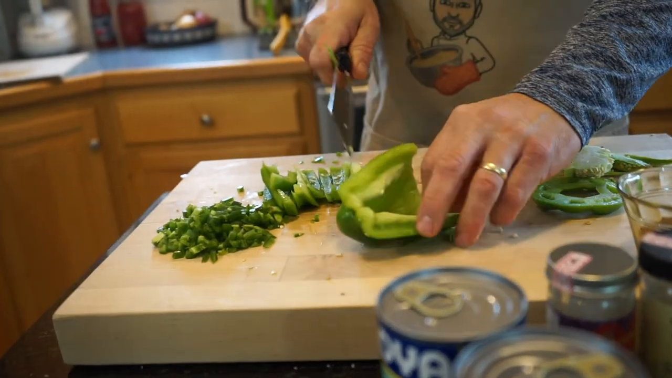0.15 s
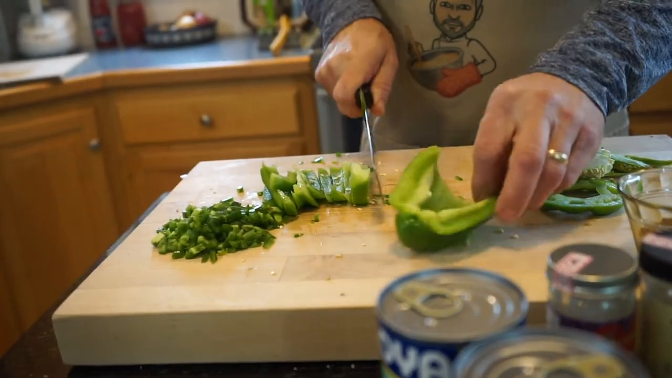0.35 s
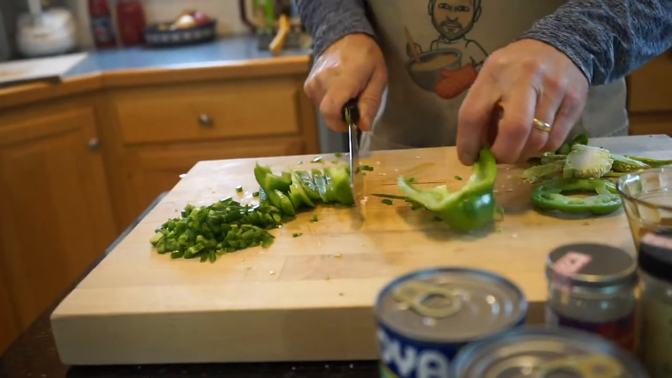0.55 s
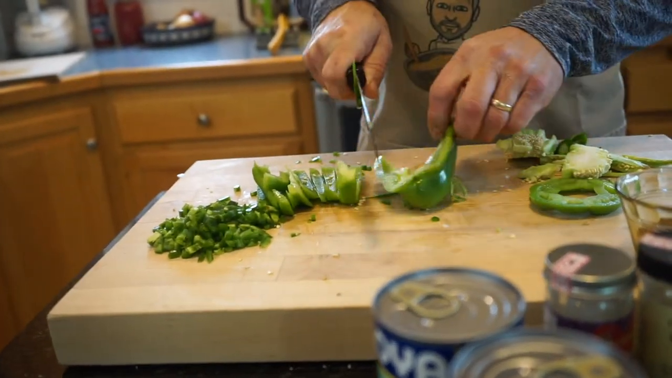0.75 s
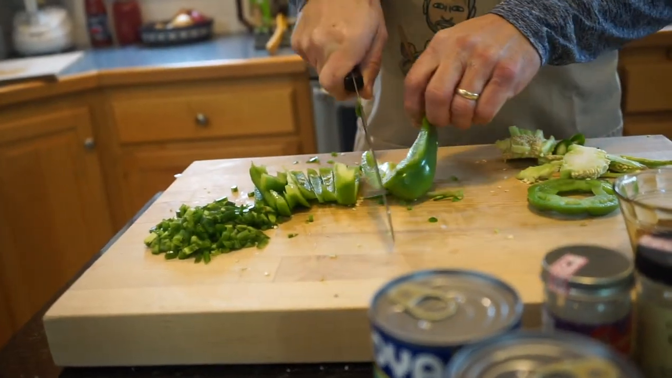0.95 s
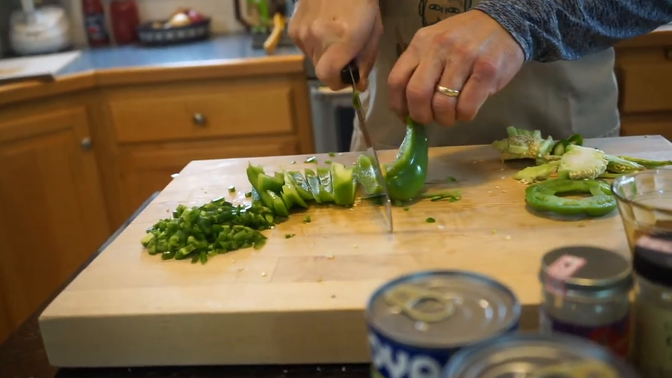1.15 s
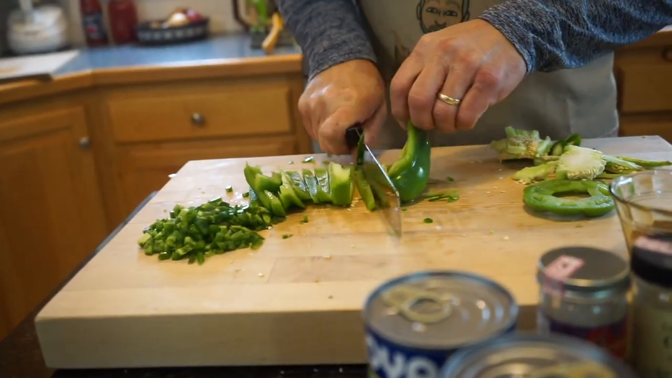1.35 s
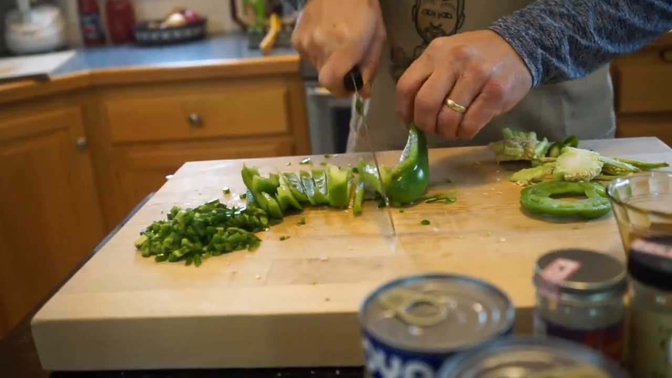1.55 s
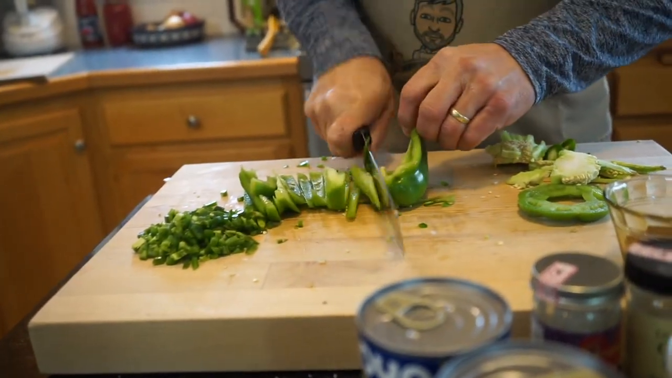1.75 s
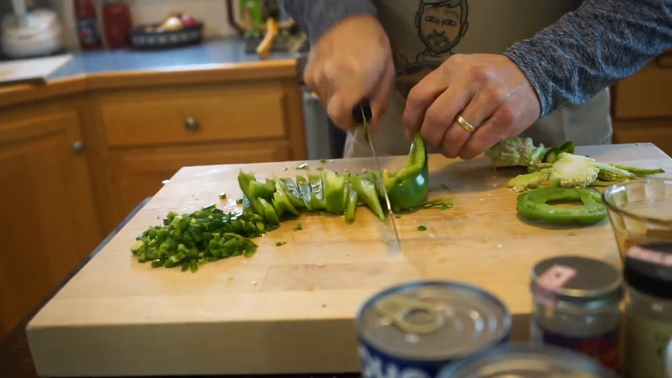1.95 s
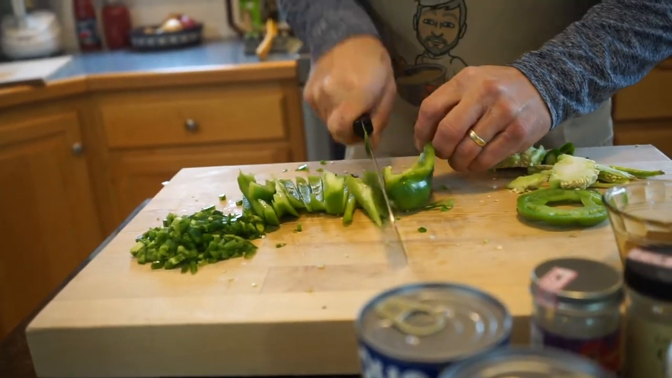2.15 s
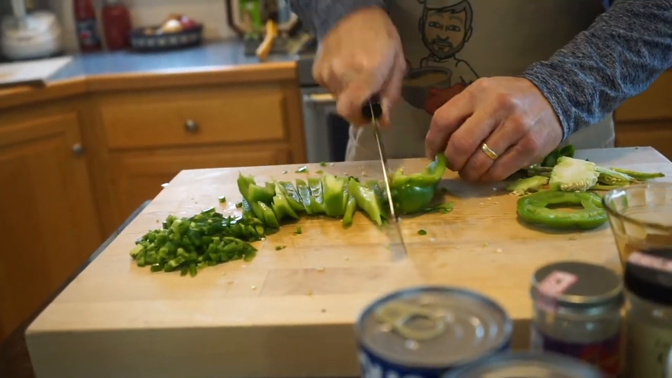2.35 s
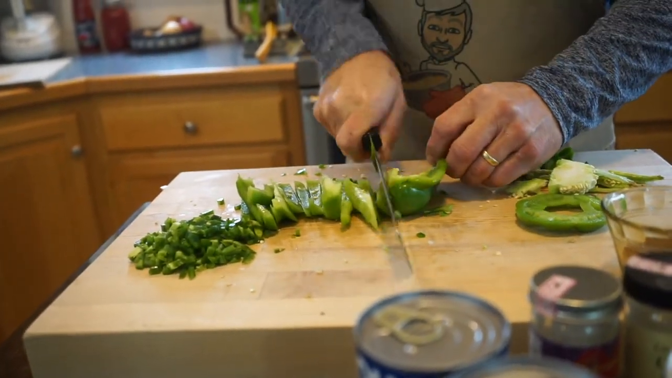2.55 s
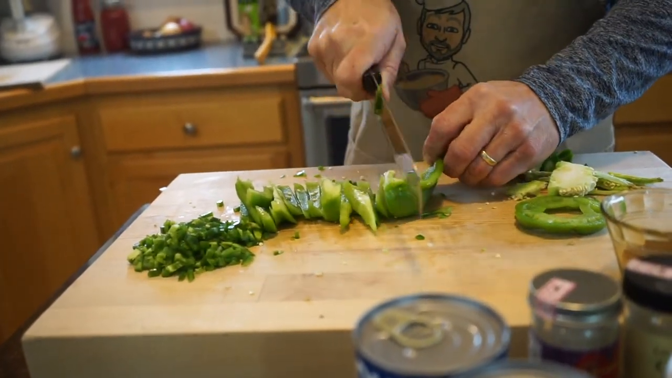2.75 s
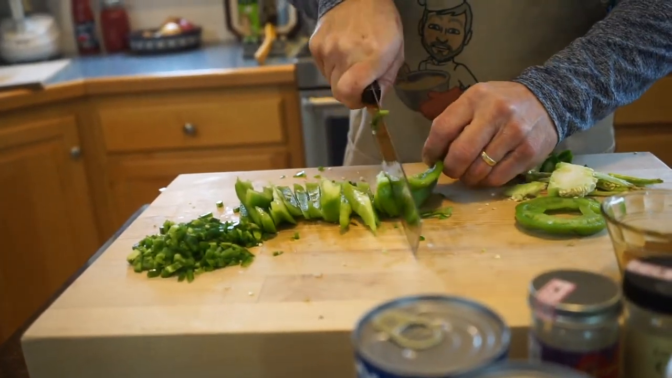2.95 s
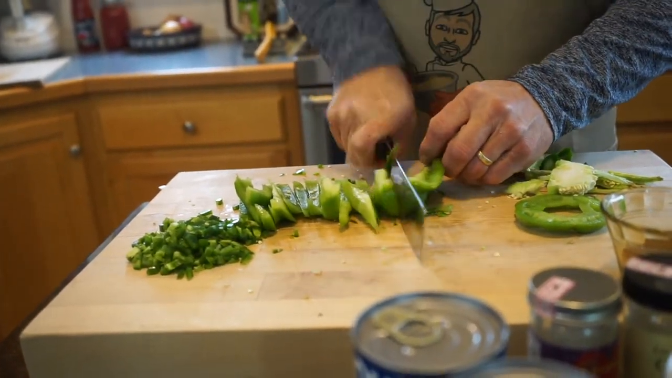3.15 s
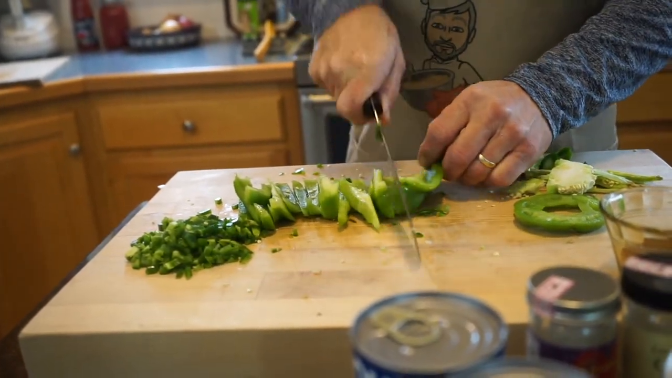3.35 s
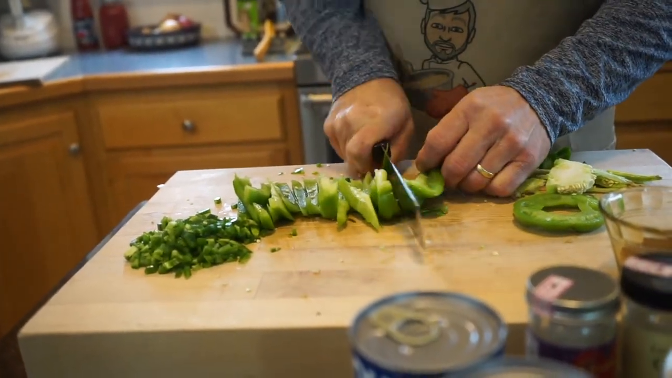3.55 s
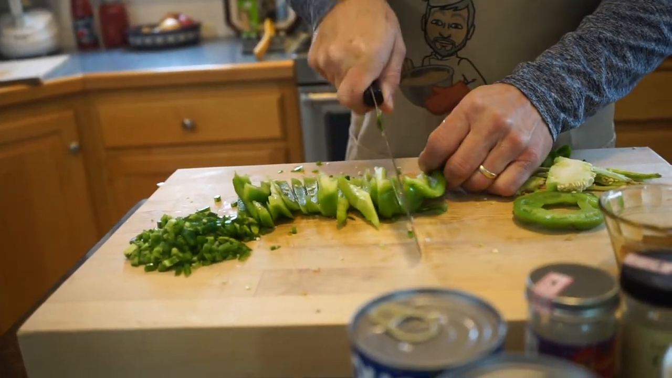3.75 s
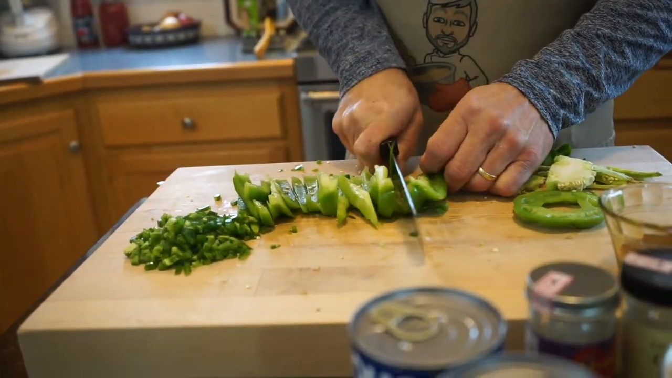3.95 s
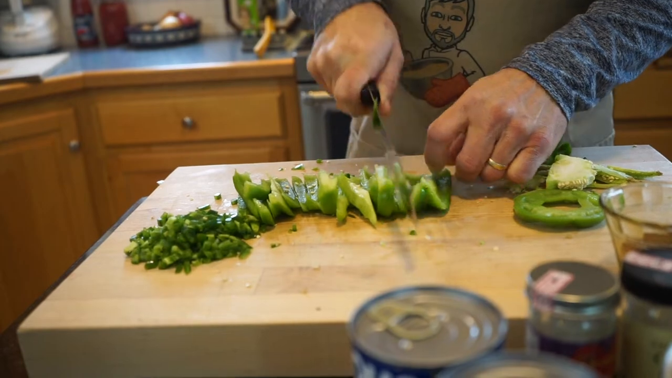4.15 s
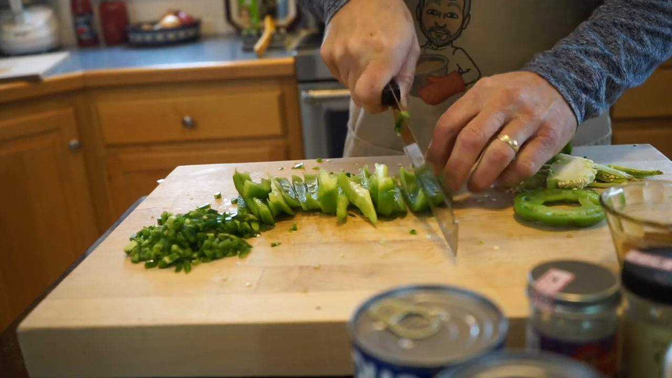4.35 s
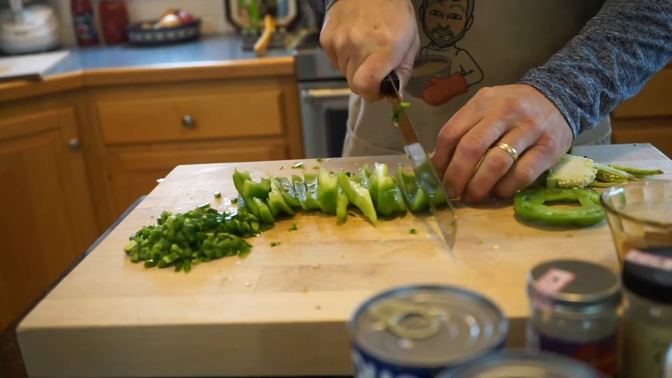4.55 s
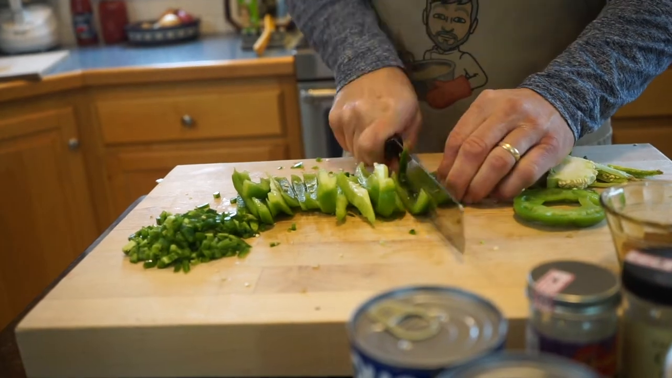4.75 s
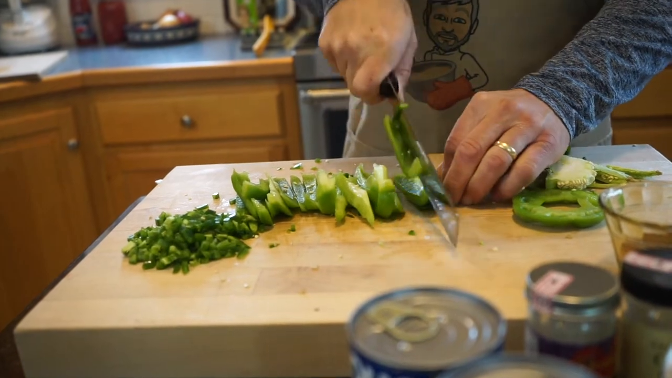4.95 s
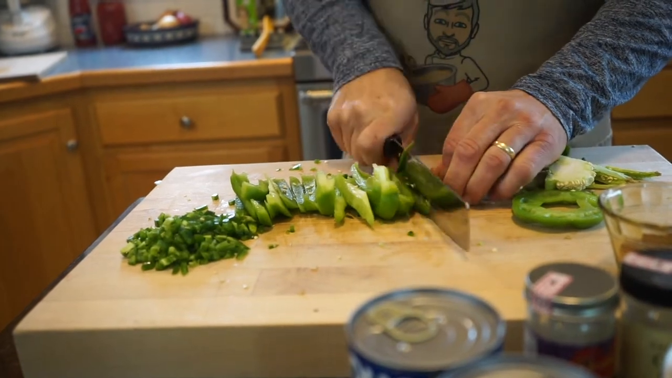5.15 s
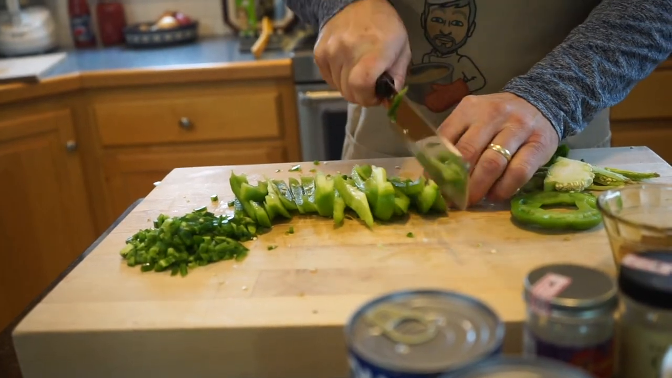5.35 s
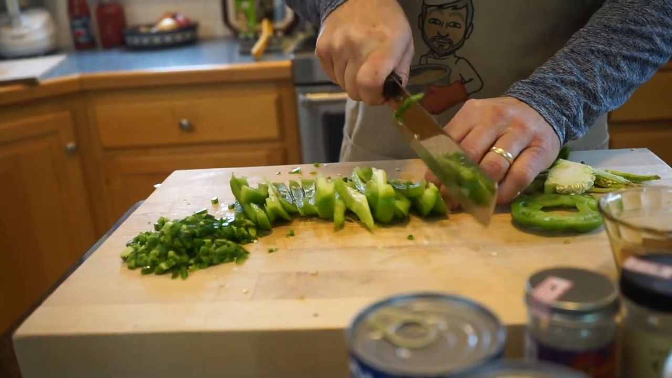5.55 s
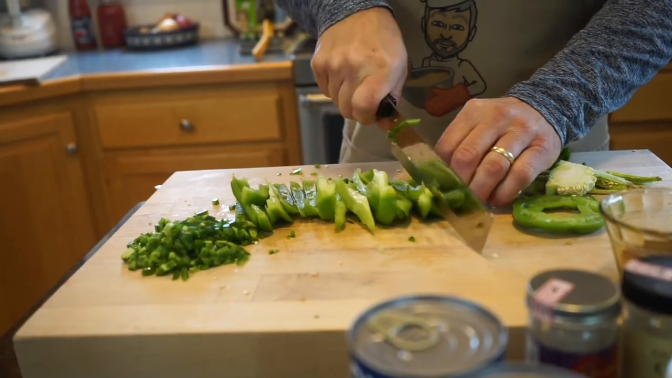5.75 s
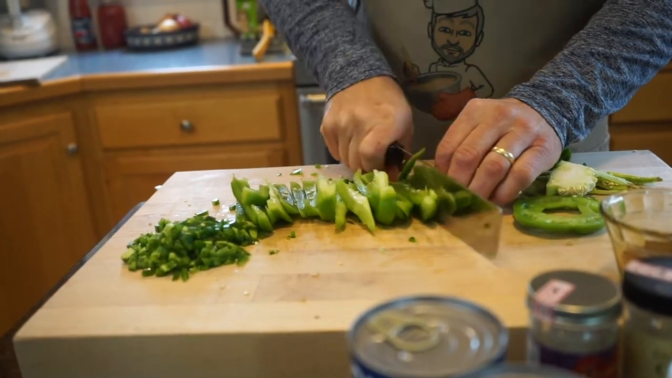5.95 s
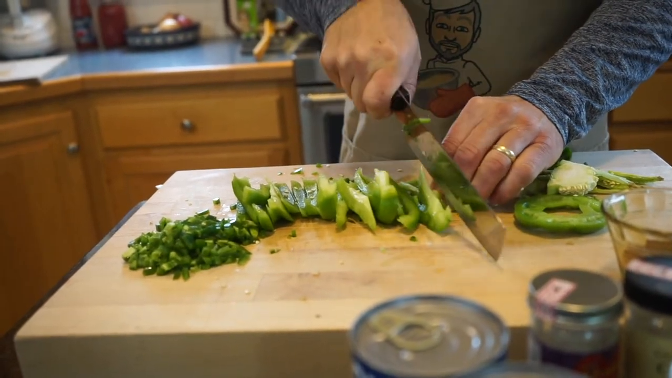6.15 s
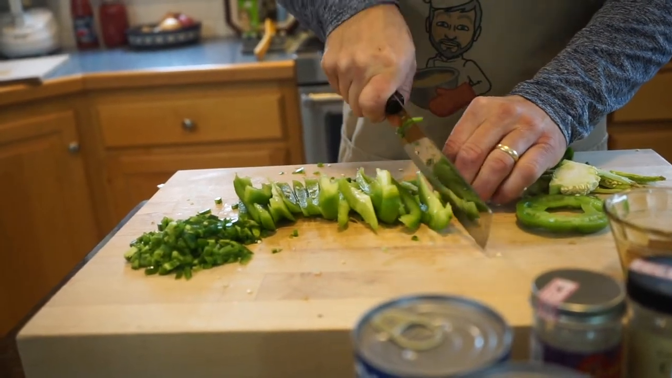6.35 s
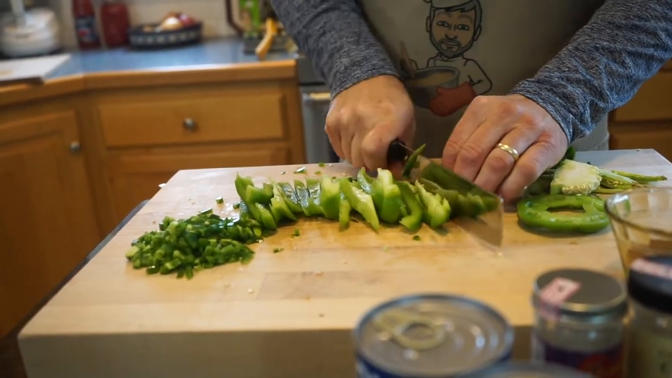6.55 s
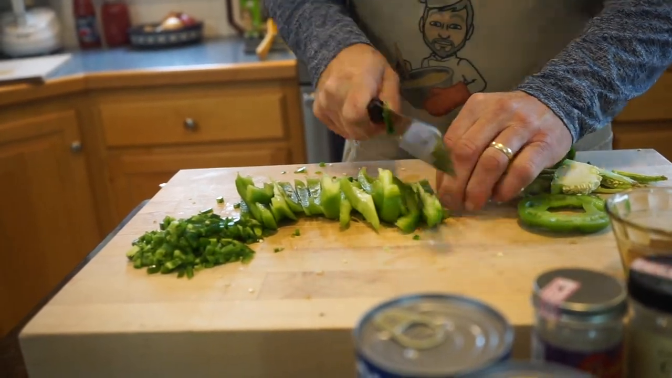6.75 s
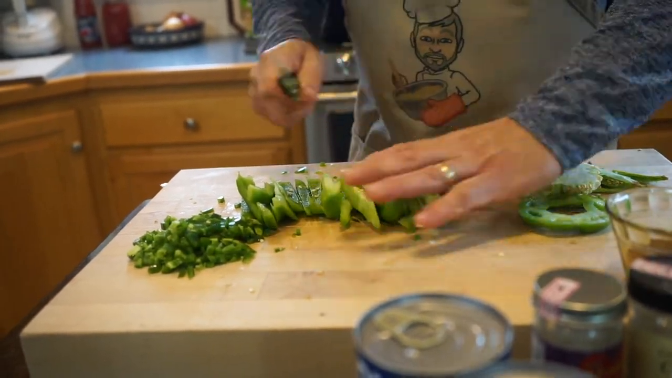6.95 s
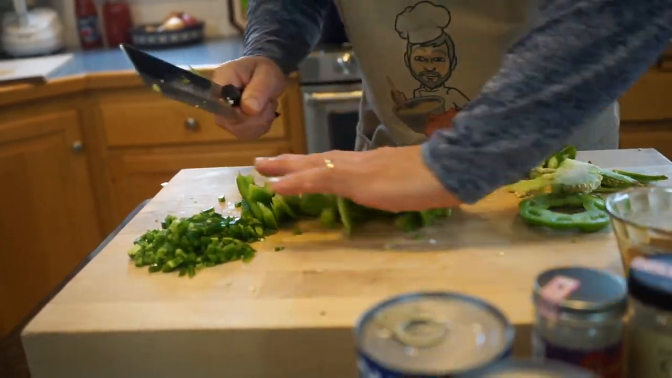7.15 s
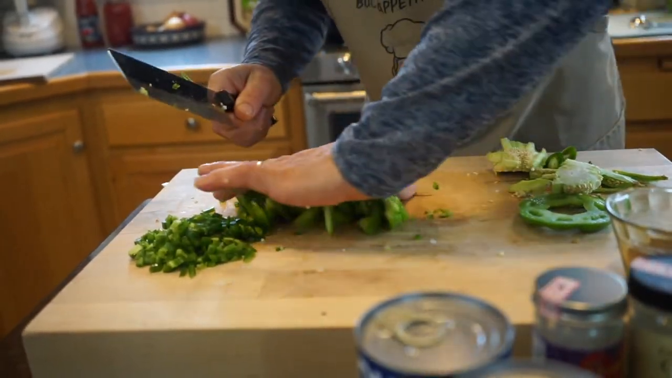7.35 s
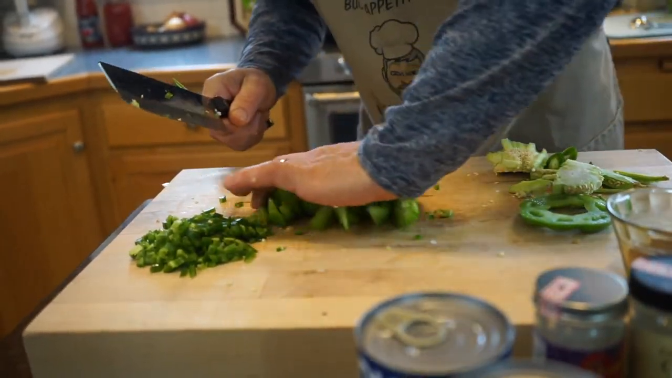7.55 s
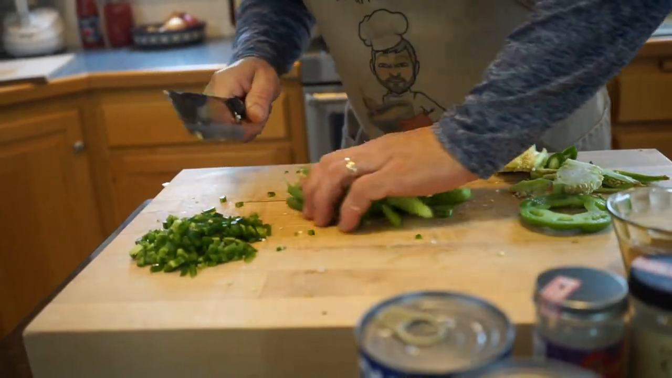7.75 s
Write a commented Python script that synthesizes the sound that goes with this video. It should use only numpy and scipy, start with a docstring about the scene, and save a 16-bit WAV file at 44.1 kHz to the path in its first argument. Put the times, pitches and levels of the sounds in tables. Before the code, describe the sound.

Close stereo sound of pepper slicing in a home kitchen. Two hard, hollow chops ring the board, followed by slower strokes in which crisp flesh crunches, skin ticks and tears, and the blade knocks wood. One brighter cracking chop falls midway. Strokes stop before the end, leaving low arm rumble, tiny snaps and brushing over quiet hiss. Short room reflections; the right side is clearer, the left duller.

```python
"""A chef's knife slices a bell pepper on a thick wooden board in a small kitchen, with a few bare chops.
Slices: bursting cells crunch, the skin clicks and tears, damped board modes knock, tiny slips scratch the wood.
Around them: faint handling, dull low bumps, arm rumble, hiss and a faint whirr, all from shaped noise or sines.
Two spaced microphones: the right hears the board best, the left picks up dull bumps and rumble."""
import sys
import numpy as np
from scipy import signal
from scipy.fft import rfft, irfft
from scipy.io import wavfile

SR = 44100
rng = np.random.default_rng(int(sys.argv[2]) if len(sys.argv) > 2 else 0)


def file_out(sig):
    """Save sig as 16-bit WAV at sys.argv[1]."""
    # one column per channel
    cols = np.atleast_2d(sig).T
    # limit, then scale
    lim = np.clip(cols, -1, 1)
    pcm = np.round(lim * 32767).astype(np.int16)
    wavfile.write(sys.argv[1], SR, pcm)


N = 343759
T = np.arange(N) / SR
CUTOFF_HZ = 11120


def amp(db):
    """Decibels to gain."""
    return 10 ** (np.asarray(db) / 20)


def unit(x):
    """Scale to rms 1."""
    return x / np.sqrt(np.mean(x ** 2) + 1e-20)


def add(track, s, sound):
    """Mix a sound in at time s."""
    start = int(s * SR)
    track[start:start + len(sound)] += sound[:N - start]


def band(x, low_hz, high_hz):
    """Gentle band-pass."""
    return signal.sosfilt(signal.butter(2, [low_hz, high_hz], "band", fs=SR, output="sos"), x)


def high_pass(x, low_hz):
    """Gentle high-pass."""
    return signal.sosfilt(signal.butter(2, low_hz, "high", fs=SR, output="sos"), x)


def decay(t, t60_s):
    """Exponential decay, 60 dB in t60_s."""
    return amp(-60 * t / t60_s)


def at_hz(points, hz):
    """Read a table on a log-frequency axis."""
    known, values = np.transpose(points)
    return np.interp(np.log(np.maximum(hz, 1)), np.log(known), values)


def colour(x, spectrum, size=4096):
    """Causal (minimum-phase) filter with the given spectrum and unit energy."""
    hz = np.arange(size // 2 + 1) * SR / size
    cepstrum = irfft(np.log(amp(at_hz(spectrum, hz))))
    pulse = irfft(np.exp(rfft(2 * cepstrum[:size // 2], size)))
    return signal.fftconvolve(x, pulse / np.linalg.norm(pulse))[:len(x)]


def drift(per_s):
    """Slow random wander, spread 1."""
    knots = rng.standard_normal(4096)
    return unit(np.interp(T * per_s, np.arange(len(knots)), knots))


def swell(s, db, rise_db_per_s, fall_db_per_s, hold_s=0):
    """Gain over time that rises to a level, holds it until time s and dies away."""
    before = rise_db_per_s * np.maximum(s - hold_s - T, 0)
    after = fall_db_per_s * np.maximum(T - s, 0)
    return amp(db - np.minimum(before + after, 200))


# slicing strokes: (blade lands [s], knock [dB], crunch [dB], crunch length [s], first bite [dB],
# slide [dB], arm rumble [dB])
SLICES = [(1.339, -35, -36, 0.018, -45.5, -62, -40.5), (1.725, -41.5, -41, 0.019, -43, -46, -40.5),
          (2.077, -35, -39, 0.011, -41.5, -47.5, -39), (2.491, -43.5, -40.5, .006, -43, -40.5, -41),
          (3.233, -44.5, -40.5, 0.014, -49, -45, -42), (3.61, -37, -40.5, 0.0063, -45, -48, -40),
          (3.975, -40, -42.5, 0.0099, -45, -52.5, -38.5), (4.775, -41, -42, 0.014, -46, -50.5, -40.5),
          (5.161, -47.5, -42, 0.037, -45.5, -51, -42.5), (5.959, -40.5, -39, 0.012, -42, -78, -39.5),
          (6.491, -46.5, -42.5, 0.039, -67, -75, -40.5)]
# chops on the almost bare board: (time [s], level [dB], brightness [dB/octave], struck-spot centre [Hz],
# struck-spot boost [dB], share of ring time left [1], blade crack [dB])
CHOPS = [(0.456, -28, 1.5, 1440, 1.5, 0.74, -24), (0.926, -28.5, 4.5, 896, 13.5, 1.0, -24),
         (2.899, -39, -0.5, 896, 11.5, 0.45, -37), (4.4228, -34, 1.8, 750, 12, 0.58, -23),
         (5.687, -42, 0, 780, 9, 0.47, -42)]
# spectrum common to all blows: (frequency [Hz], level [dB per band])
LANDING = [(430, 2), (635, 1.5), (900, -4), (1400, 2.5), (2440, -6)]
# edges of the knock bands: [Hz]
BOARD_BANDS_HZ = [330, 560, 720, 1120, 1750, 3400]
BODY_OCTAVES = 0.54   # width of the range that a chop brings out
SLICE_RING_SHARE = 0.57   # ring time left under the pressing blade


def blows():
    """Every meeting of blade and board as (s, dB per band, ring share); chops stress the struck spot's range."""
    hz = np.sqrt(np.multiply(BOARD_BANDS_HZ[:-1], BOARD_BANDS_HZ[1:]))
    plain = at_hz(LANDING, hz)
    octaves = np.log2(hz / np.median(hz))
    out = []
    for s, db, tilt, body_hz, body_db, ring_share, _ in CHOPS:
        body = body_db * np.exp(-(np.log2(hz / body_hz) / BODY_OCTAVES) ** 2)
        out.append((s, db + plain + tilt * octaves + body, ring_share))
    return out + [(s, db + plain, SLICE_RING_SHARE) for s, db, *_ in SLICES]


# modes of the board with the blade on it: (frequency [Hz], level [dB], t60 at full ring [s])
BOARD_MODES = [(368.2, -6.5, 0.25), (474.2, 9, 0.18), (504.5, 5, 0.11), (651.4, 14, 0.27), (686.4, 4, 0.23),
               (769.3, 14, 0.15), (841, 12, 0.22), (1005, -10, 0.13), (1075, -4.5, 0.21), (1220, 3, 0.045),
               (1271.4, 1, 0.11), (1352, -9, 0.25), (1442, -7.5, 0.11), (1560, -43, 0.56),
               (1890, -4.5, 0.042), (1972, 1, 0.096), (2114, -3.5, 0.062), (2258, 0, 0.034),
               (2912, -17, 0.24), (3130, -14, 0.16), (3180, -10, 0.21), (3250, -20, 0.7),
               (3290, -18.5, 0.22)]


def board_ring(low_hz, high_hz, t, ring_share, vary_db, rise_cycles):
    """Board modes in one band: low ones swell more slowly, strengths vary with the spot that is hit."""
    hz, db, t60 = np.transpose(BOARD_MODES)[:, :, None]
    in_band = (hz >= low_hz) * (hz < high_hz)
    strength = amp(db + vary_db * rng.standard_normal(hz.shape)) * in_band
    sign = (-1) ** np.arange(len(hz))[:, None]
    envelope = decay(t, t60 * ring_share) * (1 - np.exp(-t * hz / rise_cycles))
    return np.sum(sign * strength * envelope * np.sin(2 * np.pi * hz * t), axis=0)


def knocks(trim_db=1.0, thud_db=-4.0, thud_t60_s=0.1, vary_db=3.5, rise_cycles=0.33,
           tick_db=-4, tick_t60_s=0.013):
    """Each blow gives a tick of the edge, a short thud of decaying noise, then the board's lasting ring."""
    out, t, early = np.zeros(N), T[:SR // 2], SR // 30
    for s, levels, ring_share in blows():
        for low, high, db in zip(BOARD_BANDS_HZ, BOARD_BANDS_HZ[1:], levels):
            ring = unit(board_ring(low, high, t, ring_share, vary_db, rise_cycles))
            thud = band(rng.standard_normal(len(t)) * decay(t, thud_t60_s), low, high)
            thud = band(band(thud, 495, 2400), 474, 4600)
            blow = ring + amp(thud_db) * unit(thud)
            # level set over the first 1/30 s
            add(out, s, amp(db + trim_db) * blow / np.std(blow[:early]))
        # tick follows the top band
        tick = unit(band(rng.standard_normal(len(t)), 1700, 9800)) * decay(t, tick_t60_s)
        add(out, s, amp(levels[-1] + tick_db) * tick)
    return out


def chop_attack(crack_t60_s=.055, crack_low_hz=2000, crack_high_hz=2900, push_db=-11, push_t60_s=0.14):
    """A bare chop cracks in the steel blade and gives the whole board a short low shove."""
    out, t = np.zeros(N), T[:SR // 4]
    for s, db, _, _, body_db, _, steel_db in CHOPS:
        steel, wood = rng.standard_normal((2, len(t)))
        crack = unit(band(steel, crack_low_hz, crack_high_hz)) * decay(t, crack_t60_s)
        shove = unit(band(wood, 50, 340)) * decay(t, push_t60_s)
        add(out, s, amp(steel_db) * crack + amp(db + body_db / 2 + push_db) * shove)
    return out


def counter(level_db=-29, t60_s=0.5):
    """Blows shake the counter under the board: a faint low thump set by each blow's loudest band."""
    out, t = np.zeros(N), T[:SR // 2]
    for s, levels, _ in blows():
        thump = unit(band(rng.standard_normal(len(t)), 76, 235)) * decay(t, t60_s)
        add(out, s, amp(max(levels) + level_db) * thump)
    return out


# thin scraps crushed just ahead of a chop: (blade through [s], crunch [dB], length [s])
SCRAPS = [(2.894, -50.5, .014), (5.686, -54.5, 0.02)]
THROUGH_S = 0.0044   # the flesh parts this long before the blade lands
CRUNCH_RISE_DB_PER_S, CRUNCH_FALL_DB_PER_S, BITE_RISE_DB_PER_S = 800, 463, 167.5


def cutting():
    """Force in the flesh: the edge bites in slowly, then the wall gives way at once; scraps need no bite."""
    force = np.zeros(N)
    for s, _, db, length_s, bite_db, *_ in SLICES:
        through_s = s - THROUGH_S
        wall = swell(through_s, db, CRUNCH_RISE_DB_PER_S, CRUNCH_FALL_DB_PER_S, length_s)
        bite = swell(through_s, bite_db, BITE_RISE_DB_PER_S, CRUNCH_FALL_DB_PER_S)
        force += np.maximum(wall, bite)
    for s, db, length_s in SCRAPS:
        force += swell(s, db, CRUNCH_RISE_DB_PER_S, CRUNCH_FALL_DB_PER_S, length_s)
    return force


# crunch spectrum: (frequency [Hz], level [dB per Hz])
CRUNCH_SPECTRUM = [(210, -52.5), (350, -24), (481, 1.5), (572, -21), (763, 0.5), (907, -12), (1130, -12),
                   (1250, -1), (1590, -13), (3000, -2.5), (3890, -9.5), (7340, -12), (11000, -14.5),
                   (14300, -124), (22000, -120)]


def crunch(trim_db=6.0, size_db=1.0, clumps_per_s=240, cells_per_s=4000, clump_db=3.2):
    """Cells burst in clumps under the edge, thousands a second, until the blade is through."""
    sizes = amp(size_db * np.minimum(rng.exponential(1, N), 4)) * rng.choice([-1, 1], N)
    hits = rng.random(N) < cells_per_s / SR
    bursts = sizes * hits * amp(clump_db * drift(clumps_per_s))
    return amp(trim_db) * colour(unit(bursts) * cutting(), CRUNCH_SPECTRUM)


# skin giving way: (time [s], click peak [dB], rasping tear [dB])
SNAPS = [(1.272, -19.5, -38), (1.3085, -15.5, -24), (1.3223, -16, -23), (1.6422, -26.5, -37),
         (1.712, -35, -39), (2.0729, -8.5, -42), (2.879, -43, -37), (2.9639, -20.5, -50), (3.213, -32, -28),
         (3.597, -24, -32), (3.959, -22, -28), (4.744, -26, -22), (5.102, -33, -30), (5.892, -24, -30.5),
         (6.4504, -12, -32.5), (6.4617, -19, -55), (6.9583, -18.5, -50), (7.452, -26, -46)]
# click spectrum: (frequency [Hz], level [dB per Hz])
SNAP_SPECTRUM = [(300, -14), (900, 2.5), (2200, 3), (3200, 7.5), (4200, 1), (8000, 1.5), (11000, -4)]


def snaps(click_t60_s=0.022, tear_trim_db=-1, tear_t60_s=0.084, tear_rise_s=0.0045, fibres_per_s=1000):
    """The taut skin gives way with a click; fibres then tear in a short mid-pitched rasp."""
    out, t = np.zeros(N), T[:SR // 10]
    for s, peak_db, rasp_db in SNAPS:
        burst = amp(-13.5) * decay(t, click_t60_s) * rng.laplace(0, .5, len(t))
        burst[0] = 1
        click = colour(burst, SNAP_SPECTRUM)
        fibres = rng.standard_normal(len(t)) * (rng.random(len(t)) < fibres_per_s / SR)
        tear = unit(band(fibres, 2000, 3070)) * decay(t, tear_t60_s) * (1 - np.exp(-t / tear_rise_s))
        add(out, s, amp(peak_db) * click / np.abs(click).max() + amp(rasp_db + tear_trim_db) * tear)
    return out


DRAW_LEAD_S, DRAW_DB, DRAW_SLOPE_DB_PER_S = 0.19, -59.5, 88
PUSH_LEAD_S, PUSH_RISE_DB_PER_S, PUSH_FALL_DB_PER_S = 0.056, 189, 260


def sliding():
    """Friction on the wood: before each slice lands the tip is drawn back lightly, then pushed forward."""
    friction = np.zeros(N)
    for s, *_, slide_db, _ in SLICES:
        friction += swell(s - DRAW_LEAD_S, DRAW_DB, DRAW_SLOPE_DB_PER_S, DRAW_SLOPE_DB_PER_S)
        friction += swell(s - PUSH_LEAD_S, slide_db, PUSH_RISE_DB_PER_S, PUSH_FALL_DB_PER_S)
    return friction


def drag(uneven_db=2.0, slips_per_s=2200, scratch_db=1):
    """The edge slides on the wood: tiny slips scratch and keep the board murmuring."""
    slips = rng.standard_normal(N) * (rng.random(N) < slips_per_s / SR) * amp(uneven_db * drift(40))
    murmur = np.zeros(N)
    for hz, width_hz, db in [(672, 99, -0.5), (1284, 51, 0.0), (1950, 230, -6.5)]:
        murmur += amp(db) * unit(band(slips, hz - width_hz / 2, hz + width_hz / 2))
    scratch = unit(band(slips, 1010, 2560))
    return unit(murmur + amp(scratch_db) * scratch) * sliding()


# faint handling sounds: hands and loose pieces brushing the board, one faint blade ting:
# (middle [s], half length [s], level [dB], centre [Hz])
HANDLING_SOUNDS = [(0.34, 0.042, -64.5, 8900), (0.522, 0.053, -58, 8000), (1.498, 0.013, -51.5, 5600),
                   (1.588, 0.017, -65, 1970), (4.086, 0.012, -47, 500), (6.065, 0.035, -50, 1140),
                   (6.204, 0.042, -54, 1480), (6.644, 0.035, -56.5, 2200), (7.032, 0.012, -48.5, 1200),
                   (7.696, 0.079, -58, 3000)]


def handling(grain_db=3):
    """Hands and loose pieces brushing the board, one faint blade ting: grainy noise in two-octave bands."""
    out = np.zeros(N)
    for s, half_s, db, hz in HANDLING_SOUNDS:
        noise = unit(band(rng.standard_normal(N), hz / 2, min(hz * 2, CUTOFF_HZ)))
        grains = noise * amp(grain_db * drift(200))
        out += amp(db) * grains * np.exp(-((T - s) / half_s) ** 2)
    return out


# dull bumps at the left microphone: (time [s], peak before trim [dB])
BUMPS = [(1.415, -35), (2.16, -38.5), (2.573, -38.5), (3.307, -36.5), (3.685, -37.5), (4.053, -36),
         (5.24, -35), (6.065, -32.5), (6.583, -36)]


def bumps(trim_db=7, bump_hz=215, bump_t60_s=0.017, rise_s=0.0093):
    """Something soft rocks just after most slices: a few low cycles, 22 dB weaker at the right."""
    out, t = np.zeros(N), T[:SR // 10]
    bump = np.sin(2 * np.pi * bump_hz * t) * decay(t, bump_t60_s) * (1 - np.exp(-(t / rise_s) ** 2))
    for s, db in BUMPS:
        add(out, s, amp(db + trim_db) * bump / np.abs(bump).max())
    return out * amp([[0], [-22]])


# the free arm sweeps the slices together: (time [s], rumble [dB])
REACHES = [(6.98, -41), (7.349, -44)]
SWAY_LAG_S, SWAY_RISE_DB_PER_S, SWAY_FALL_DB_PER_S = 0.063, 59, 40   # peaks after each landing
STILL_DB, CHOP_SWAY_DB = -51.5, -49   # resting arms, and after a chop


def arm_motion(reach_slope_db_per_s=35):
    """The arms sway after every stroke and move more slowly when gathering the slices."""
    landings = [(s, db) for s, *_, db in SLICES] + [(s, CHOP_SWAY_DB) for s, *_ in CHOPS]
    sways = [swell(s + SWAY_LAG_S, db, SWAY_RISE_DB_PER_S, SWAY_FALL_DB_PER_S) for s, db in landings]
    reaches = [swell(s, db, reach_slope_db_per_s, reach_slope_db_per_s) for s, db in REACHES]
    return np.maximum(amp(STILL_DB), np.max(sways + reaches, axis=0))


# rumble spectrum: (frequency [Hz], level [dB per Hz])
RUMBLE_SPECTRUM = [(15, 5.5), (30, -1.5), (60, -5.5), (100, -13.5), (200, -20.5), (300, -25), (600, -43.5),
                   (2000, -49)]


def rumble(left_db=5, right_db=-3, right_cut_hz=45):
    """Low handling rumble that follows the arms, from unrelated noise in the two microphones."""
    left, right = (unit(colour(noise, RUMBLE_SPECTRUM)) for noise in rng.standard_normal((2, N)))
    right = unit(high_pass(right, right_cut_hz))
    return np.array([amp(left_db) * left, amp(right_db) * right]) * arm_motion()


# hiss spectrum: (frequency [Hz], level [dB per Hz])
AIR_SPECTRUM = [(59, -39), (100, -1), (167, -12.5), (307, 2), (412, -9.5), (587, -7.5), (853, -12),
                (1040, -12), (1170, -12.5), (1600, -9), (2520, -13.5), (3190, -9.5), (4110, -19),
                (5310, -15.5), (11000, -27.5), (14300, -75), (22000, -120)]


def background(left_db=-61.5, right_db=-54.5, whirr_hz=1045, whirr_width_hz=70,
               whirr_left_db=-74, whirr_right_db=-62):
    """Steady hiss with the faint narrow whirr of an appliance."""
    hiss = np.array([unit(colour(noise, AIR_SPECTRUM)) for noise in rng.standard_normal((2, N))])
    low_hz, high_hz = whirr_hz - whirr_width_hz / 2, whirr_hz + whirr_width_hz / 2
    whirr = unit(band(rng.standard_normal((2, N)), low_hz, high_hz))
    return hiss * amp([[left_db], [right_db]]) + whirr * amp([[whirr_left_db], [whirr_right_db]])


def scattered(x, t60_s=0.1):
    """A dense cluster of quick reflections from the counter, jars and cook."""
    t = T[:SR // 10]
    echoes = rng.standard_normal(len(t)) * decay(t, t60_s)
    return signal.fftconvolve(x, echoes / np.linalg.norm(echoes))[:N]


# kitchen reverberation: (frequency [Hz], t60 [s])
KITCHEN = [(300, 0.39), (1300, 0.4), (3000, 0.45), (9000, 0.21)]


def kitchen_response(build_up_s=0.0081):
    """Diffuse reflections that die band by band, different at each microphone."""
    t, edges = T[:SR * 2 // 3], np.geomspace(150, 14000, 9)
    tail = np.zeros((2, len(t)))
    for low, high in zip(edges, edges[1:]):
        t60_s = at_hz(KITCHEN, np.sqrt(low * high))
        tail += band(rng.standard_normal((2, len(t))), low, high) * decay(t, t60_s)
    tail = tail * (1 - np.exp(-(t / build_up_s) ** 2))
    return tail / np.linalg.norm(tail, axis=1, keepdims=True)


# colour of the left microphone: (frequency [Hz], level [dB])
LEFT_MIC = [(200, -1.5), (600, -9.5), (1300, -5), (2600, -11.5), (4500, 0), (10000, 1.5)]
LEFT_LAG_S = 0.0017


def microphones(x, right_db=3.5, left_db=-4, room_db=-12, scatter_db=2):
    """Sound reaches the right microphone directly, the left one later, thinner and largely scattered."""
    mixed = (x + amp(scatter_db) * scattered(x)) / np.hypot(1, amp(scatter_db))
    left = np.interp(T - LEFT_LAG_S, T, mixed)
    room = amp(room_db) * signal.fftconvolve(x[None], kitchen_response(), axes=1)[:, :N]
    left_room, right_room = room
    return np.array([amp(left_db) * colour(left + left_room, LEFT_MIC), amp(right_db) * (x + right_room)])


def scene():
    """Board, pepper and handling reach both microphones, over bumps, rumble and room hiss."""
    wood = knocks() + chop_attack() + counter() + drag()
    pepper = crunch() + snaps()
    return microphones(wood + pepper + handling()) + bumps() + rumble() + background()


def record(dry):
    """Peaks beyond full scale clip; a steep low-pass cuts the top."""
    low_pass = signal.ellip(10, .2, 70, CUTOFF_HZ, fs=SR, output="sos")
    return signal.sosfilt(low_pass, np.clip(dry, -1, 1))


dry = scene()
out = record(dry)
file_out(out)
```